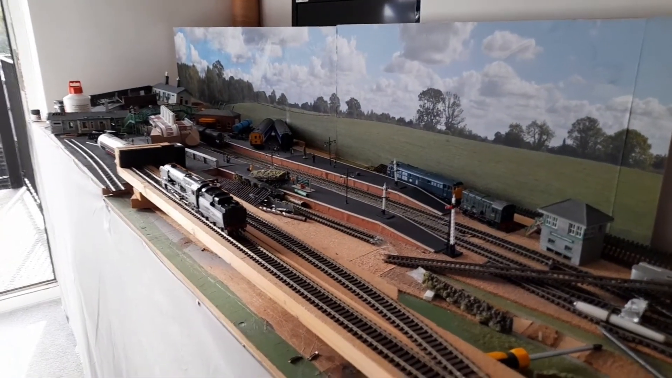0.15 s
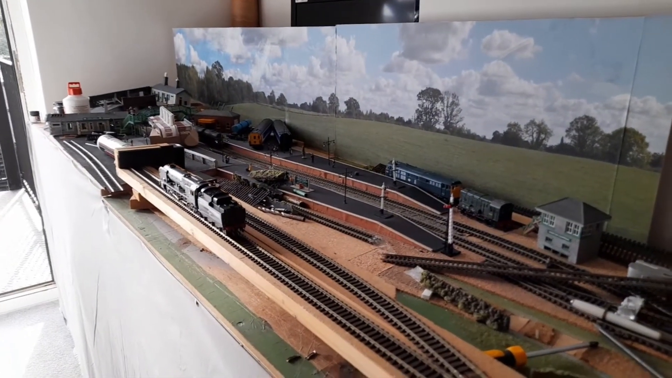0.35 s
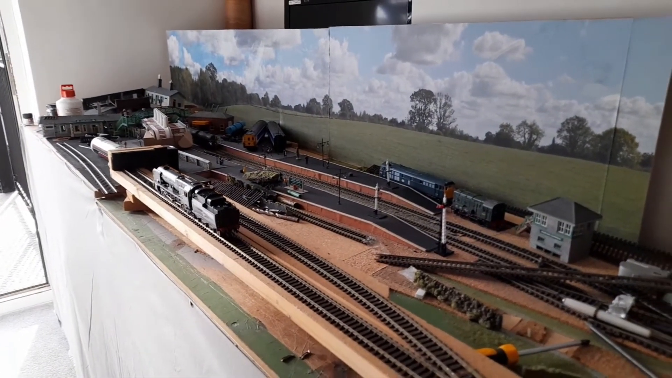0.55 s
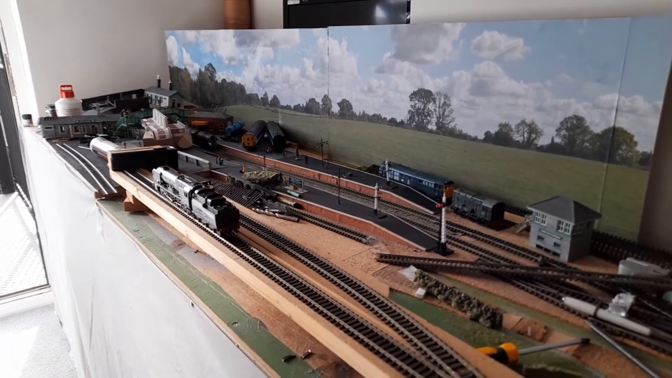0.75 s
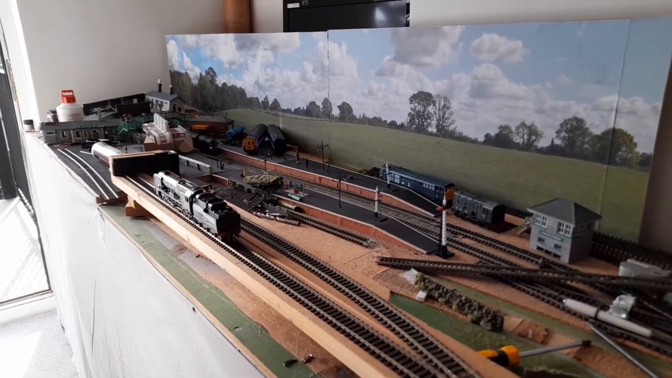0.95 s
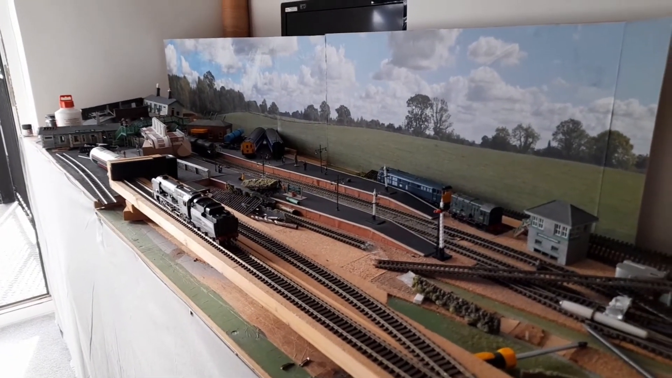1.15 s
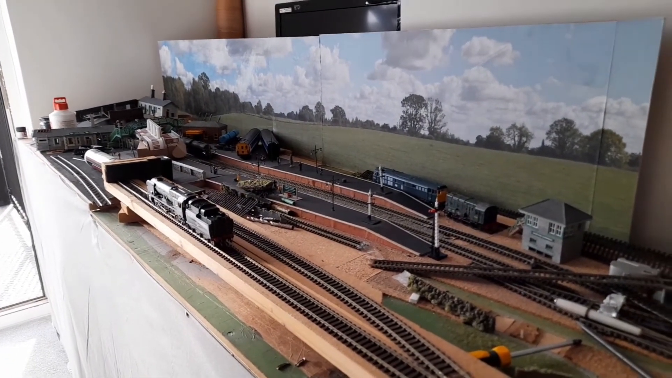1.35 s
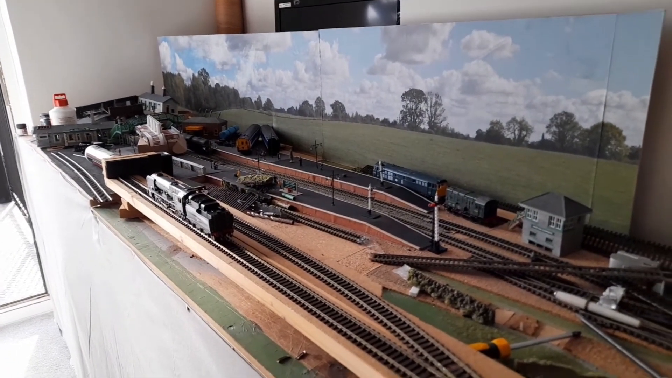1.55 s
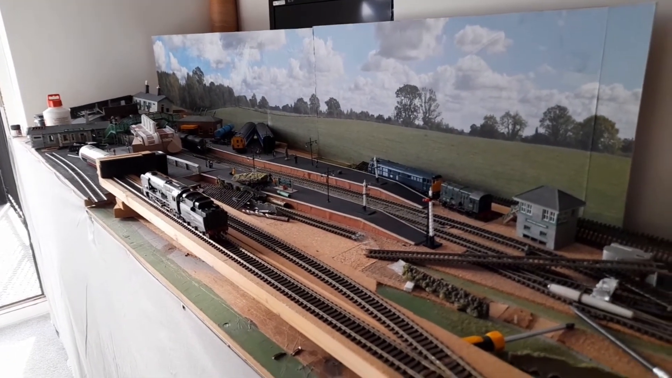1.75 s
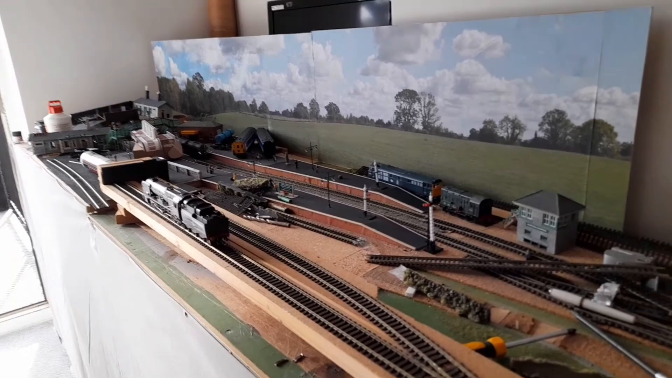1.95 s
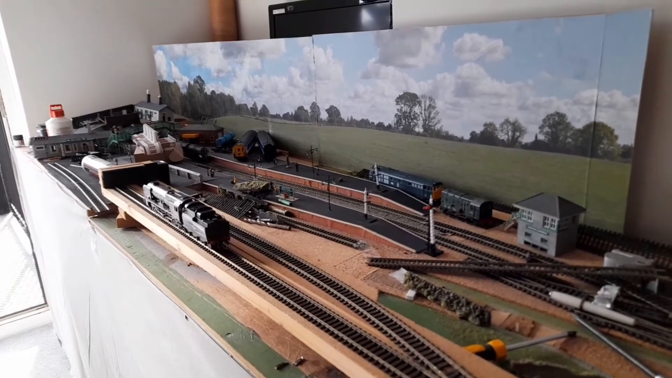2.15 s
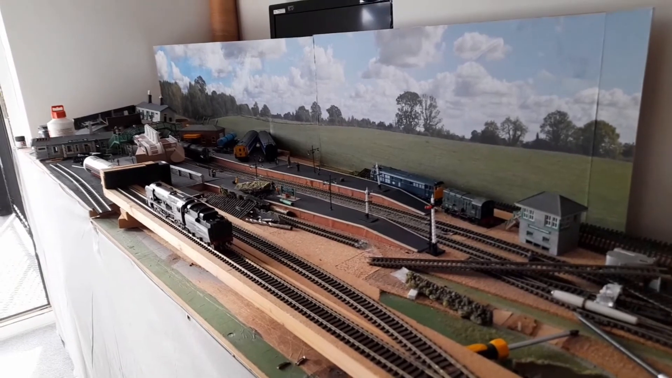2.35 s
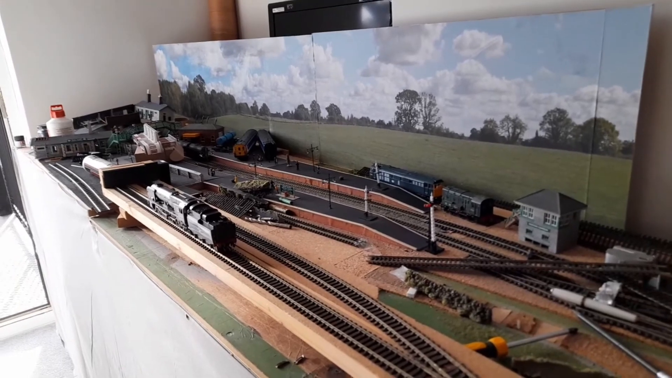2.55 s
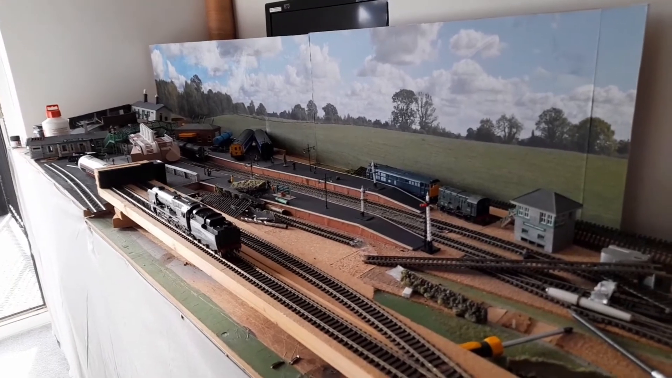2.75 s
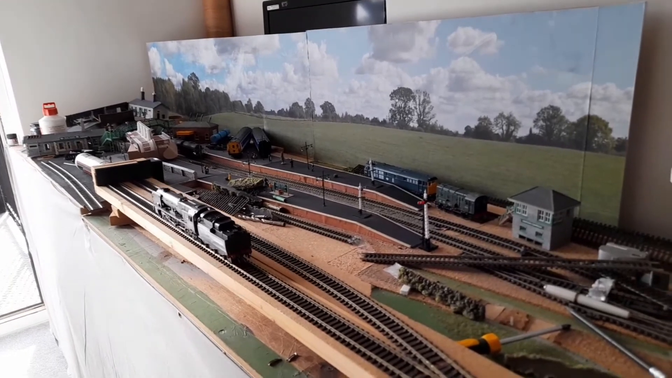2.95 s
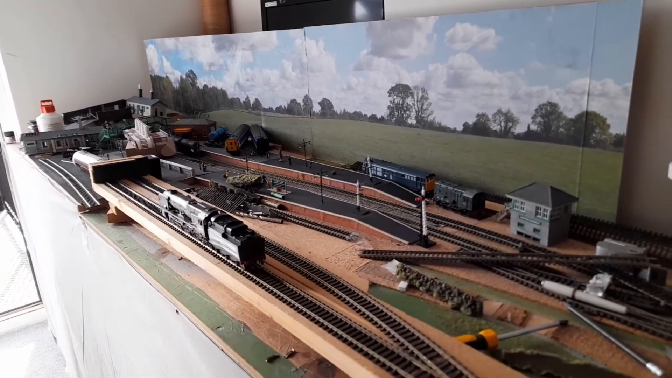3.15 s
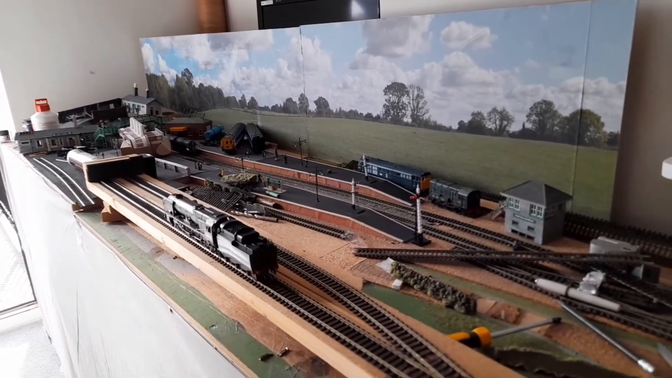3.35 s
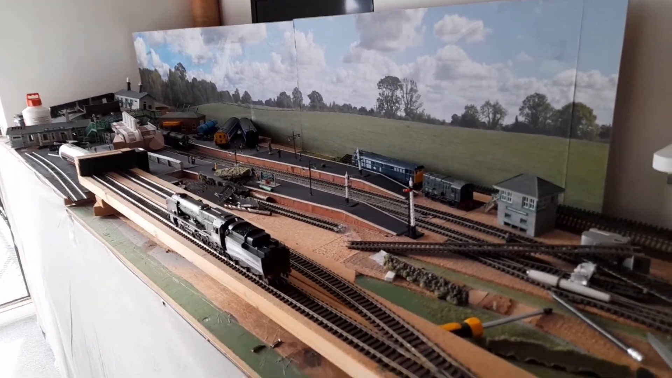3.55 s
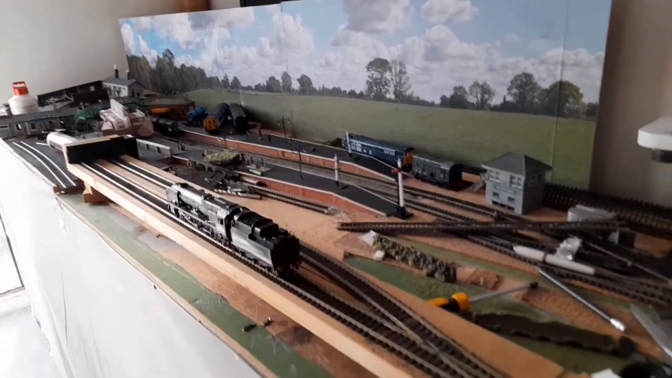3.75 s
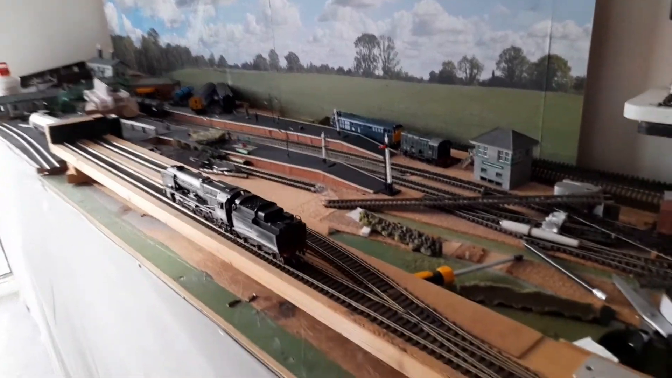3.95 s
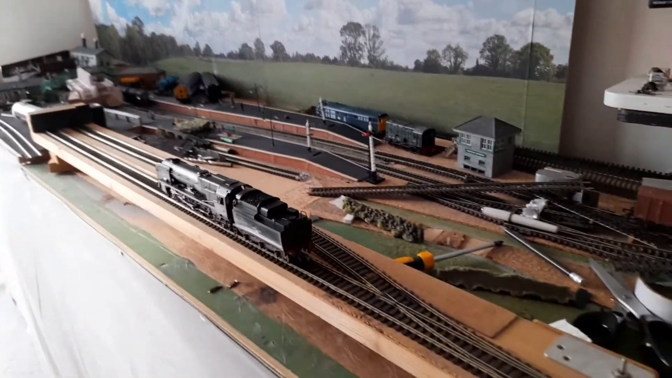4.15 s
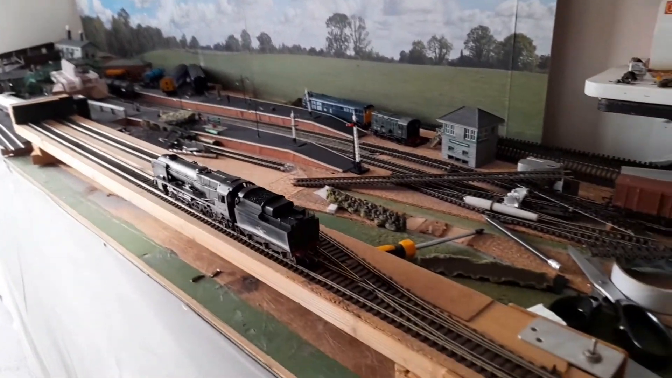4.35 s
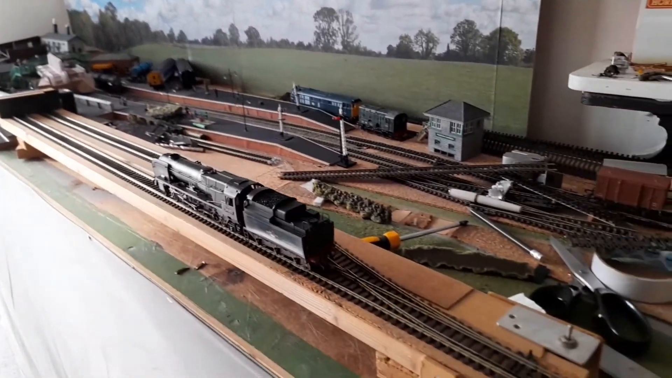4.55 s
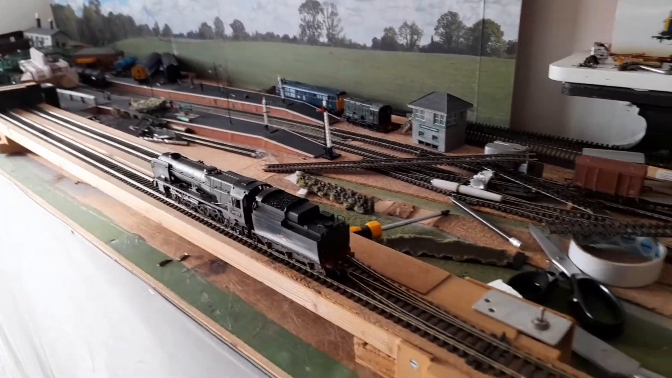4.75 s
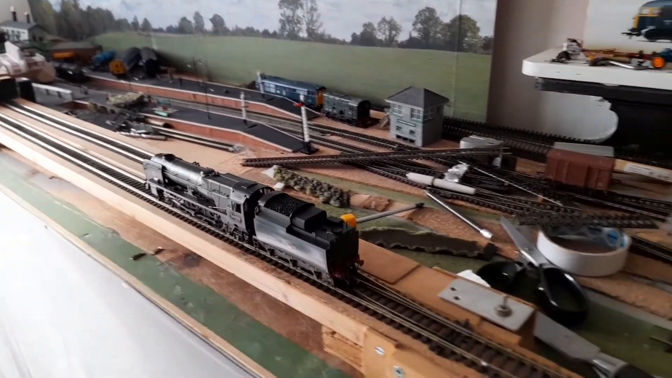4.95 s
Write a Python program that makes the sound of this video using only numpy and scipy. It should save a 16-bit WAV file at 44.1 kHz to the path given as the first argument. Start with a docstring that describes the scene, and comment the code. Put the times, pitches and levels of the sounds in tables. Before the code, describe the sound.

Soft handling of a controller surrounds two quick, loud metallic snaps from a track switch. After a short lull, a small electric model train sets off with a whirr and a gear rattle. Its wheels hiss, knock and tick along the track on a wooden baseboard, clicking hardest as it nears the microphone. Faint sparrow chirps and a low room background lie underneath.

```python
"""A model locomotive starts and rolls closer in a small room: its motor hums, its gears rattle, its
wheels rumble on the wooden baseboard and hiss and tick over the rails. Before it moves, a point switch
snaps over and back, ringing its panel, and a hand rubs on the controller. Sparrows chirp faintly
outside, over the low murmur of the house."""
import sys
import numpy as np
from scipy import signal
from scipy.fft import rfft, irfft, next_fast_len
from scipy.io import wavfile
from scipy.ndimage import map_coordinates

SR = 44100
rng = np.random.default_rng(int(sys.argv[2]) if len(sys.argv) > 2 else 0)


def transcribe(u):
    """Save the signal u as a 16-bit wav file named by the first command-line argument.

    u: samples, shape (n,) or (channels, n), limited to [-1, 1]; the rate is SR.
    q: integer samples, one column per channel.
    """
    v = np.clip(np.atleast_2d(u).T, -1, 1)
    q = np.round(v * 32767).astype(np.int16)
    wavfile.write(sys.argv[1], SR, q)


N = 224468

# locomotive load: time_s, effort_db
EFFORT = [(2.45, -73.5), (2.6, -61), (2.74, -53.5), (2.86, -45), (3.12, -41.5), (3.32, -39.5),
          (3.43, -41.5), (3.75, -42), (3.92, -43), (4.05, -41.0), (4.22, -43), (4.3, -44), (4.56, -44),
          (4.62, -40.5), (4.82, -38.5), (4.9, -42), (5.09, -40)]
# motor harmonics: shaft_multiple, level_db
HUM_ORDERS = [(7, -1.5), (8, -4.5), (9, -0.5), (10, -4), (13, 0)]
# gear mesh resonance: time_s, centre_hz, level_re_gears_db
GEAR_RASP = [(2.7, 1102, -18), (3.0, 1100, -12), (3.3, 1202, -4.5), (3.7, 1310, -7.5), (4.05, 1340, -5),
             (4.45, 1335, -4), (4.8, 1385, -6.5), (5.09, 1370, -6.5)]
# board resonance: time_s, centre_hz, level_db
BOARD_DRONE = [(2.72, 370, -71), (2.83, 368, -52.5), (3.18, 372, -57.5), (3.32, 385, -42), (3.43, 390, -53),
               (3.54, 385, -42), (3.68, 360, -55.5), (3.9, 380, -51), (4.08, 365, -55), (4.33, 362, -51),
               (4.5, 370, -68)]
# spells of hollow clatter: time_s, level_db
BOARD_CLATTER = [(2.74, -75), (2.88, -54), (3.0, -53), (3.1, -56), (3.25, -45), (3.5, -60), (3.95, -60),
                 (4.04, -48), (4.23, -46.5), (4.27, -58), (4.72, -63.5), (4.82, -45.5), (4.92, -67),
                 (5.09, -52.5)]
# locomotive and board spectra: freq_hz, density_db
GEAR_SPECTRUM = [(350, -12.5), (560, -12), (720, -3), (800, -5), (880, 2), (970, -6), (1070, 3.5),
                 (1200, -0.5), (1350, 2.5), (1550, -0.5), (1750, -3), (1880, -3), (2020, -7.5),
                 (2250, -4.5), (2600, -9), (3000, -10.5), (3800, -16.5), (6000, -29), (8500, -28.5)]
WHIRR_SPECTRUM = [(500, -9), (1000, -1), (1700, 14), (2300, 12), (3000, 2), (5000, -42), (9000, -45)]
FAR_BOARD_SPECTRUM = [(25, -48.5), (50, -5), (70, -7.5), (95, -7.5), (130, -2), (180, -12.5), (215, -2.5),
                      (275, 2.5), (400, -7.5), (455, -6), (525, 0), (630, -4.5), (730, -5.5), (850, -15.5),
                      (1300, -15), (3000, -76)]
NEAR_BOARD_SPECTRUM = [(25, -45.5), (50, -14), (70, 3), (95, -3), (130, -1.5), (180, -7), (230, -1),
                       (320, -0.5), (400, -1.5), (460, -3), (525, -6), (620, -7.5), (700, -6), (850, -20),
                       (1300, -28), (3000, -78.5)]
CLATTER_SPECTRUM = [(250, -15), (480, -4), (580, 0.5), (780, 6), (1000, 0), (1300, -1), (3000, -45)]
WHEEL_SPECTRUM = [(1800, -48), (3200, -2.5), (4500, 0.5), (5400, 1), (6200, 1.5), (7500, -3.5), (8700, -13),
                  (10000, -7.5), (11500, -2.5), (14800, -2), (15800, -2.5)]
# baseboard bumps: start_s, level_db, pitch_hz, rise_s, t60_s, boom_re_mode_db, thwack_db
BUMPS = [(1.3985, -25.5, 335, .002, .065, -11, -37), (3.45, -37, 255, .012, .2, -4, -58),
         (3.5, -30.5, 375, .016, .255, -6, -56.5), (3.99, -39, 282, .02, .35, -5, -60),
         (4.592, -31, 222, .011, .27, -4, -58), (4.645, -33.5, 400, .012, .24, -4.5, -57)]
# hard contacts: start_s, crack_db, clack_db, ping_db
TICKS = [(1.084, -60, -58, -70), (1.665, -49, -65.5, -75), (3.0223, -60, -33, -50), (3.1855, -56, -35, -52),
         (3.204, -56, -34.5, -54), (4.027, -60, -45, -60), (4.073, -58, -37, -53), (4.6761, -52, -40, -52),
         (4.8024, -33.5, -28.5, -40), (4.847, -56, -36, -56), (4.9296, -34.5, -37, -52.5),
         (5.048, -49, -31, -52), (5.0592, -41, -31.5, -53)]
# switch throws: start_s, snap_db, knock_db, ring_db, top_treble_db
THROWS = [(0.9913, -28.5, -36, -33.5, 8.5), (1.135, -23.5, -22, -23.5, -8)]
# switch and panel modes: freq_hz, over_db, back_db, t60_s
SWITCH_MODES = [(136.2, -14, -16.5, 0.31), (361.4, 1.5, 0, 0.21), (554.5, -25, -6, 0.21),
                (696, -20, -24, 0.12), (767, -10, -13, 0.31), (951, -21, 0.5, 0.15), (1240, -18, -11, 0.18),
                (1527, -13, -12, 0.13), (2160, 3.5, -5, 0.16), (2320, -14, -10, 0.12),
                (2560, -14, -22, 0.154), (2990, -10, -11, 0.24), (4340, -7, -10, .12),
                (4900, -2, -25, 0.097), (5800, -11, -3, 0.14), (5700, -19, -11, .13)]
# hand strokes: start_s, hold_s, rub_db, scrape_db
STROKES = [(-.03, 0.15, -58, -80.5), (0.159, 0.18, -71, -85), (0.629, 0.067, -57, -66),
           (0.786, 0.105, -62, -62.5), (1.275, 0.14, -52, -58), (1.357, 0.01, -46, -55),
           (1.39, 0.035, -41, -51), (1.463, 0.088, -56.5, -52.5), (1.656, 0.14, -60.5, -78),
           (1.846, 0.11, -57.5, -80), (2.08, 0.11, -68, -87.5)]
# switch, hand and room spectra: freq_hz, density_db
SNAP_SPECTRUM = [(700, -7), (1300, -15), (1900, -6.5), (2150, 2.5), (2700, -5), (3300, -4), (4600, -4),
                 (5700, -3.5), (6500, -7.5), (7500, -3.5), (8900, -16.5), (11000, -6.5), (12500, -12.5),
                 (15000, -21), (15800, -29)]
KNOCK_SPECTRUM = [(40, -40.5), (70, -14), (140, -10.5), (220, -13), (290, -13), (360, 0), (450, -32),
                  (560, -5.5), (740, -3.5), (1000, -4.5), (1170, -7), (1500, -10), (3000, -28.5)]
RUB_SPECTRUM = [(80, 7), (160, -3), (330, 3), (600, 4.5), (1000, -3.5), (1400, -8), (2200, -14),
                (4000, -29.5)]
SCRAPE_SPECTRUM = [(900, -4), (1400, 4), (1800, -6), (2400, -4.5), (3300, -3.5), (4200, -9), (6000, -8),
                   (8000, -27), (15000, -29)]
ROOM_SPECTRUM = [(20, -29), (50, -2), (85, 1.5), (130, -0.5), (190, -6), (350, -8.5), (650, -11.5),
                 (1200, -16), (2400, -25.5), (3600, -26), (6000, -24), (8500, -26), (15000, -23)]
# two-turn sparrow calls: start_s, pitch_hz, level_db, stretch_ratio, turn_ratio, turn_db, scoop_ratio
CHEEPS = [(.434, 4440, -54.5, .872, .886, -4, .03), (.757, 4680, -54, .836, .7, 0, .05),
          (2.849, 4750, -45, .993, .89, -1.5, .09), (3.465, 4450, -49, .9, .93, 3.5, .15)]
# cheep arch, dive and second turn: offset_s, pitch_weight, turn_weight, level_db
CHEEP_SHAPE = [(0, 1, 0, -8), (.009, 1, 0, 0), (.032, 0.994, 0, 1), (.042, .87, 0, 1.5),
               (.056, .66, 0, -18), (.074, .33, .5, 1), (.089, 0, 1, 0.5), (.099, .5, .25, -1),
               (.114, .66, 0, -9.5)]
# single sparrow slides: start_s, pitch_hz, rise_ratio, level_db, rasp_ratio
CHIPS = [(1.503, 4680, 0.226, -56, .05), (1.62, 4610, .17, -56, 0.015), (2.106, 4310, 0.12, -61, .015),
         (2.142, 5360, 0.117, -58, 0.138), (2.231, 4370, 0.088, -58, 0.03), (2.608, 4600, .02, -53.5, 0.01),
         (4.36, 4640, 0.13, -51.5, 0.017), (4.645, 4550, .015, -45, .012), (4.96, 4610, .08, -45, 0.018),
         (4.988, 4620, .04, -47, 0.023)]
# left-right likeness: freq_hz, correlation
COHERENCE = [(60, 0), (150, 0.76), (330, 0.56), (700, 0.52), (1300, 0.33), (2400, 0.19), (5000, 0.02)]
SWITCH_COHERENCE = [(100, 0.38), (380, 0.79), (700, 0.13), (1300, -0.29), (3000, 0.061)]
# stereo balance: freq_hz, left_minus_right_db
BALANCE = [(60, -3), (110, -2.5), (200, -5), (380, -4), (700, 0), (1290, -1.5), (2380, 1.5), (4400, 1),
           (8120, -2.5), (15000, 0.5)]
SWITCH_BALANCE = [(60, -8), (200, -4), (380, -5.5), (700, -2.5), (1300, -0.5), (2400, 1), (4400, 0),
                  (8100, -4), (15000, -3)]

BOARD_PAN_DB = [[-2.2], [1.8]]
DIRECT_SHARE = 0.3  # share of rattle power that pulses with the teeth


def locomotive(cruise_db=-42.5, cruise_turns_per_s=41.3, slowing_per_db=0.02, approach_s=(3.06, 4.94)):
    """One shaft drives motor, gears and wheels; effort slows it and raises every level."""
    effort_db = curves(EFFORT)[0] - cruise_db
    near = np.interp(clock(), approach_s, [0, 1])
    turns_per_s = cruise_turns_per_s * np.exp(-slowing_per_db * effort_db)
    turns = np.cumsum(turns_per_s * (1 + .008 * wobble(14))) / SR
    teeth = tooth_contacts(turns)
    rattle = gears(teeth, near, level_db=-43.5 + 0.966 * effort_db - 0.2 * near)
    rumble = baseboard(teeth, level_db=-44.5 + 1.2 * effort_db - 4.5 * near)
    hiss = wheels(teeth, level_db=-52.5 + 0.51 * effort_db + 3.4 * near)
    hum = motor(turns, level_db=-53 + effort_db - 3.5 * near)
    left_lead = lambda hz: np.exp(np.outer([1j, -1j], np.pi * hz * 6e-5))  # 60 us
    return filtered(gate(EFFORT) * (churn(rattle + rumble) + hiss + hum), left_lead)


def tooth_contacts(turns, per_turn=6, jitter_s=0.00054, spread_db=4.5, t60_s=0.028):
    """Envelope of loose gear contacts, uneven in time and force, each ringing the body briefly."""
    due = np.flatnonzero(np.diff(np.floor(turns * per_turn)))
    late, force = rng.standard_normal((len(due), 2)).T
    hits = np.clip(due + late * jitter_s * SR, 0, N - 1).astype(int)
    impulses = unit(np.bincount(hits, amp(spread_db * np.clip(force, -2, 2)), N))
    decay = amp(-60 * np.arange(SR // 4) / SR / t60_s)
    power = signal.fftconvolve(impulses ** 2, decay ** 2)[:N]
    return unit(np.sqrt(np.abs(power)))


def chatter(teeth, share=DIRECT_SHARE):
    """Noise pulsed by the teeth; the room smears the rest into a steady rush."""
    return noise() * np.sqrt(np.abs(share * teeth ** 2 + 1 - share))


def gears(teeth, near, level_db, whirr_db=-6.5, whirr_start_s=2.56, flutter_db=1.5):
    """Meshing teeth rattle and excite a drifting resonance; a whirr switches on, fades on approach."""
    # reflections change on the approach
    far_rattle, near_rattle = (walls(chatter(teeth), wet_db=-5.5, t60_s=0.069) for _ in range(2))
    rattle = np.sqrt(1 - near) * far_rattle + np.sqrt(near) * near_rattle
    out = amp(level_db + 0.19 * wobble(22.4)) * coloured(rattle, GEAR_SPECTRUM)
    whirr_gain = amp(level_db + whirr_db) * (clock() > whirr_start_s) * (1 - near)
    out += whirr_gain * coloured(chatter(teeth), WHIRR_SPECTRUM)
    centre_hz, rasp_db = curves(GEAR_RASP)
    bite = amp(flutter_db * wobble(35)) * np.sqrt(DIRECT_SHARE * teeth ** 2 + 1 - DIRECT_SHARE)
    return out + amp(level_db + rasp_db) * unit(bite * resonance(centre_hz, width_hz=260))


def baseboard(teeth, level_db, crossover_s=(4.4, 4.7), uneven_db=1.23):
    """Wheels shake the board, which rumbles, drones and clatters differently from place to place."""
    near = np.interp(clock(), crossover_s, [0, 1])
    wood = np.sqrt(1 - near) * coloured(chatter(teeth), FAR_BOARD_SPECTRUM)
    wood += np.sqrt(near) * coloured(chatter(teeth), NEAR_BOARD_SPECTRUM)
    rumble = amp(level_db + uneven_db * wobble(12)) * wood
    drone_hz, drone_db = curves(BOARD_DRONE)
    drone = gate(BOARD_DRONE) * amp(drone_db) * resonance(drone_hz, width_hz=70) * amp(BOARD_PAN_DB)
    clatter_gain = gate(BOARD_CLATTER) * amp(curves(BOARD_CLATTER)[0])
    return rumble + drone + clatter_gain * coloured(noise() * teeth, CLATTER_SPECTRUM)


def wheels(teeth, level_db):
    """Gritty hiss of wheels rolling on rails."""
    return amp(level_db) * coloured(chatter(teeth, share=0.27), WHEEL_SPECTRUM)


def motor(turns, level_db, waver_db=4):
    """Hum at wavering harmonics of the shaft rate."""
    tones = sum(amp(db + waver_db * wobble(7)) * np.sin(2 * np.pi * order * turns + 1.6 * wobble(14))
                for order, db in HUM_ORDERS)
    return amp(level_db) * tones * amp(BOARD_PAN_DB)


def bumps():
    """Soft bumps thwack the board and ring it at one main pitch."""
    out = np.zeros((2, N))
    thwack_spectrum = [(200, -6), (600, -4), (1400, -12), (3200, -14), (4500, -28), (12000, -35)]
    for start_s, db, hz, rise_s, t60_s, boom_db, thwack_db in BUMPS:
        mode = np.sin(2 * np.pi * hz * (clock() - start_s)) * amp(BOARD_PAN_DB)
        boom_spectrum = [(hz / 4, -26), (hz * .65, -7), (hz, 0), (hz * 2, -10), (hz * 4, -22),
                         (hz * 20, -60)]
        boom = amp(boom_db) * coloured(noise(), boom_spectrum)
        out += amp(db) * blow(start_s, rise_s, t60_s) * (mode + boom)
        contact = blow(start_s, 0.00037, 0.034) + amp(-9) * blow(start_s, 0.002, 0.19)
        out += amp(thwack_db) * contact * coloured(noise(), thwack_spectrum)
    return out


def ticks(ping_hz=2670):
    """Small hard contacts crack, clack the body and ping the rail."""
    crack, clack, ping = np.zeros((3, N))
    for start_s, crack_db, clack_db, ping_db in TICKS:
        crack += amp(crack_db) * (blow(start_s, 0.000185, 0.014) + amp(-19) * blow(start_s, 0.00234, 0.6))
        clack += amp(clack_db) * blow(start_s, 0.00089, 0.043)
        ping += amp(ping_db) * blow(start_s, 0.00092, 0.05)
    crack_spectrum = [(400, -24), (1500, -3), (3500, -0.5), (6500, 8.5), (9000, -1), (12000, 2.5),
                      (15000, -8)]
    clack_spectrum = [(300, -20), (800, -9), (1500, 3.5), (2000, -4), (4000, -15), (9000, -43)]
    out = crack * coloured(noise(), crack_spectrum) + clack * coloured(noise(), clack_spectrum)
    return out + ping * np.sin(2 * np.pi * (ping_hz * clock() + rng.random((2, 1))))


def point_switch():
    """Each throw snaps steel; a knock swells in the panel and rings it."""
    out = np.zeros((2, N))
    for throw, (start_s, snap_db, knock_db, ring_db, top_db) in enumerate(THROWS):
        out += amp(snap_db) * steel_snap(start_s, top_db)
        knock = coloured(noise(), KNOCK_SPECTRUM, SWITCH_COHERENCE, SWITCH_BALANCE)
        out += amp(knock_db + 4) * blow(start_s, 0.023, 0.21) * knock
        out += amp(ring_db) * panel_ring(start_s, throw)
    return out


def steel_snap(start_s, top_db, treble_hz=6500, dulling_db_per_s=45):
    """The slide scrapes, hits its stop and fills the room; the treble dies first."""
    scrape = amp(-31.5) * blow(start_s - .0015, .0005, .02)
    crack = amp(7) * blow(start_s, 0.00073, 0.023)
    tail = amp(-2.5) * blow(start_s, 0.0077, 0.27)
    steel = filtered(noise(), lambda hz: amp(log_interp([(11000, 0), (13500, top_db)], hz)))
    burst = (scrape + crack + tail) * coloured(steel, SNAP_SPECTRUM, SWITCH_COHERENCE, SWITCH_BALANCE)
    treble = filtered(burst, lambda hz: hz ** 4 / (hz ** 4 + treble_hz ** 4))
    return burst + treble * (amp(0.5 - dulling_db_per_s * since(start_s)) - 1)


def panel_ring(start_s, throw, blur_rad=0.4):
    """Decaying modes, blurred as reflections pile up; short waves reach the two sides out of step."""
    out = np.zeros((2, N))
    for hz, *throw_db, t60_s in SWITCH_MODES:
        phase = 2 * np.pi * (rng.random() + rng.normal(0, 1, (2, 1)) * (hz / 1800) ** 2)
        blur = blur_rad * wobble(70) * np.minimum(since(start_s) / .03, 2)
        pan = amp(log_interp(SWITCH_BALANCE, hz) * np.array([[.5], [-.5]]))
        envelope = amp(throw_db[throw] + rng.normal(0, 1)) * blow(start_s, .004, t60_s)
        out += pan * envelope * np.sin(2 * np.pi * hz * clock() + phase + blur)
    return out


def hand(attack_s=0.0089, t60_s=0.51):
    """Uneven rubbing on the controller, with a finer scrape on top."""
    rub_power, scrape_power = np.zeros((2, N))
    for start_s, hold_s, rub_db, scrape_db in STROKES:
        attack = 1 - np.exp(-since(start_s) / attack_s)
        stroke = attack * amp(-60 * since(start_s + hold_s) / t60_s)
        rub_power += (amp(rub_db) * stroke) ** 2
        scrape_power += (amp(scrape_db) * stroke) ** 2
    grip = unit(amp(0.87 * wobble(69.75)))
    rub, scrape = (coloured(walls(noise(), wet_db=1, t60_s=0.14), spectrum)
                   for spectrum in (RUB_SPECTRUM, SCRAPE_SPECTRUM))
    return grip * (np.sqrt(rub_power) * rub + np.sqrt(scrape_power) * scrape)


def sparrows(direct_db=-8.5, wet_db=-3.5, husk_ratio=0.05, husk_db=-9, flutter_db=3):
    """Quavering whistles with a husk around them, smeared by the walls."""
    whistle, husk = np.zeros((2, N))
    quaver, scatter, flutter = wobble(900), wobble(1100), amp(flutter_db * wobble(220))
    for hz, envelope, rasp in (*cheeps(), *chips()):
        whistle += envelope * flutter * np.sin(phase_rad(hz * (1 + rasp * quaver)))
        husk += envelope * np.sin(phase_rad(hz * (1 + (rasp + husk_ratio) * scatter)))
    out = amp(direct_db) * whistle + amp(wet_db) * echoes(whistle, t60_s=0.44)
    return out + amp(husk_db) * echoes(husk, t60_s=0.25)


def cheeps(scoop_s=0.00927, rasp=0.02):
    """Calls that swoop up and warble through two turns; yields pitch, envelope, rasp."""
    offset_s, pitch_weight, turn_weight, shape_db = np.transpose(CHEEP_SHAPE)
    second_turn = np.interp(offset_s, offset_s[[3, 5]], [0, 1])
    for start_s, hz, db, stretch, turn, turn_db, scoop in CHEEPS:
        times_s = start_s + stretch * offset_s
        swoop = 1 - scoop * np.exp(-since(start_s) / scoop_s)
        pitch_hz = swoop * np.interp(clock(), times_s, hz * (pitch_weight + turn * turn_weight))
        gains = amp(db + shape_db + turn_db * second_turn)
        yield pitch_hz, np.interp(clock(), times_s, gains, left=0, right=0), rasp


def chips(base_s=0.027, slide_s=0.06):
    """Single upward slides, longer when wider; yields pitch, envelope, rasp."""
    for start_s, hz, rise, db, rasp in CHIPS:
        progress = np.minimum(since(start_s) / (base_s + slide_s * rise), 1)
        envelope = amp(db) * np.sqrt(2 * np.abs(np.sin(np.pi * progress)))
        yield hz * (1 + rise * (progress - .5)), envelope, rasp


def room(level_db=-57.5):
    """Low house murmur under a thin steady hiss."""
    coherence = [(60, 0.54), (350, 0.19), (700, 0.11), (1400, 0)]
    return amp(level_db + 0.07 * wobble(4.6)) * coloured(noise(), ROOM_SPECTRUM, coherence)


def walls(pair, wet_db, t60_s):
    """Reflections add a fine ripple of resonances; rms 1."""
    return unit(pair + amp(wet_db) * np.array([echoes(x, t60_s)[0] for x in pair]))


def echoes(x, t60_s):
    """Diffuse tail, unrelated left and right."""
    t = np.arange(SR // 2) / SR
    tail = rng.standard_normal((2, len(t))) * amp(-60 * t / t60_s)
    return signal.fftconvolve(x[None], tail / np.linalg.norm(tail[0]), axes=1)[:, :N]


def churn(x, depth_db=1.2):
    """Each band swells and sags on its own."""
    bands = signal.stft(x, nperseg=512)[2]
    smoothing = np.outer(np.hanning(9), np.hanning(11))
    swell = signal.convolve2d(rng.standard_normal(bands.shape[1:]), smoothing, "same")
    return signal.istft(bands * amp(depth_db * unit(swell)), nperseg=512)[1][:, :N]


def resonance(centre_hz, width_hz):
    """Wavering narrow noise band, partly alike left and right."""
    phase = phase_rad(centre_hz * (1 + .02 * wobble(18)))
    band = lambda: wobble(width_hz) * np.sin(phase) + wobble(width_hz) * np.cos(phase)
    return unit(band() + 0.61 * np.array([band(), band()]))


def coloured(pair, spectrum, coherence=COHERENCE, balance=BALANCE):
    """Two unrelated drives, shaped by (freq_hz, density_db) points and spread in stereo; rms 1."""
    def mid_side(hz):
        angle = np.arccos(np.clip(log_interp(coherence, hz), -1, 1)) / 2
        return amp(log_interp(spectrum, hz)) * [np.cos(angle), np.sin(angle)]
    mid, side = filtered(pair, mid_side)
    pan = lambda hz: amp(np.outer([.5, -.5], log_interp(balance, hz)))
    return unit(filtered(np.array([mid + side, mid - side]), pan))


def filtered(x, response):
    """Apply a frequency response."""
    size = next_fast_len(N + 8192)
    return irfft(rfft(x, size) * response(np.fft.rfftfreq(size, 1 / SR)), size)[..., :N]


def blow(start_s, attack_s, t60_s):
    """Impact envelope."""
    t = since(start_s)
    return (1 - np.exp(-t / attack_s)) * amp(-60 * np.minimum(t / t60_s, 2))


def gate(rows, fade_s=0.04):
    """Soft gate over a table's time span."""
    return np.clip(np.minimum(clock() - rows[0][0], rows[-1][0] - clock()) / fade_s + 1, 0, 1)


def curves(rows):
    """Per-sample values of each column after time_s."""
    times_s, *columns = np.transpose(rows)
    return [np.interp(clock(), times_s, column) for column in columns]


def log_interp(points, hz):
    """Interpolate (freq_hz, value) points on a log axis."""
    knots_hz, values = np.transpose(points)
    return np.interp(np.log(hz + 1), np.log(knots_hz + 1), values)


def wobble(knots_per_s):
    """Smooth random curve."""
    return map_coordinates(rng.standard_normal(int(N * knots_per_s / SR) + 4), [clock() * knots_per_s])


def noise():
    return rng.standard_normal((2, N))


def phase_rad(hz):
    return 2 * np.pi * np.cumsum(hz) / SR


def amp(db):
    return 10 ** (np.asarray(db) / 20)


def unit(x):
    """Scale to rms 1."""
    return x / np.sqrt(np.mean(x ** 2) + 1e-20)


def clock():
    return np.arange(N) / SR


def since(start_s):
    return np.maximum(clock() - start_s, 0)


def scene():
    """Stereo sum of all sources."""
    return point_switch() + bumps() + ticks() + hand() + locomotive() + sparrows() + room()


def record(dry, low_cut_hz=32, top_hz=15650):
    """Third-order low cut, hard upper band limit."""
    return filtered(dry, lambda hz: (hz < top_hz) * hz ** 3 / np.sqrt(hz ** 6 + low_cut_hz ** 6))


dry = scene()
out = record(dry)
transcribe(out)
```